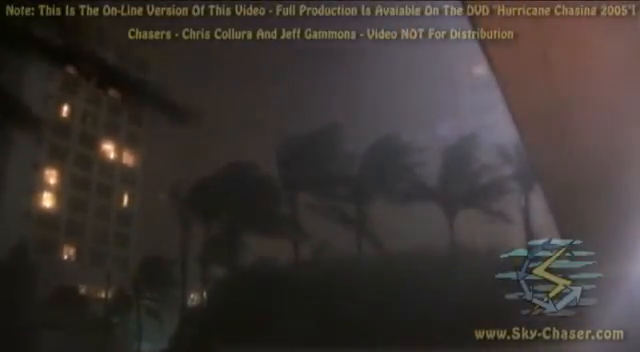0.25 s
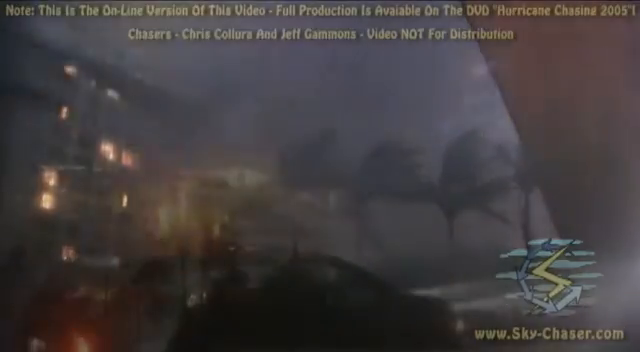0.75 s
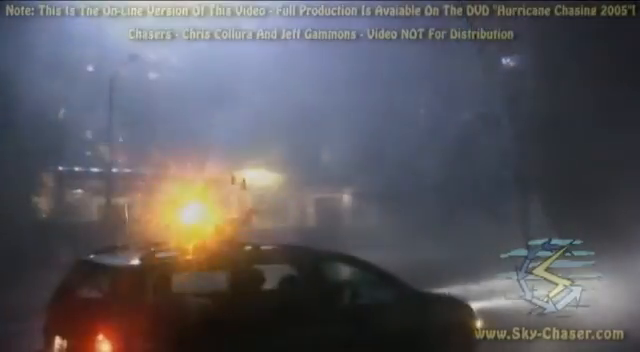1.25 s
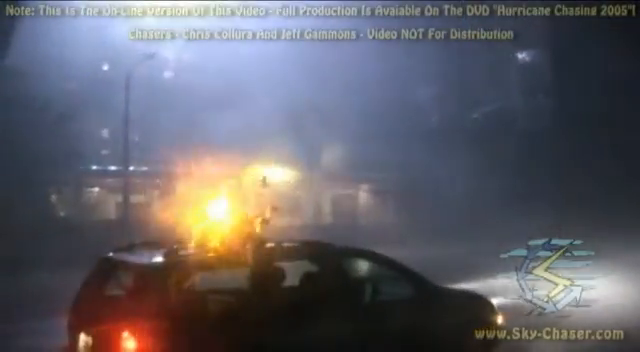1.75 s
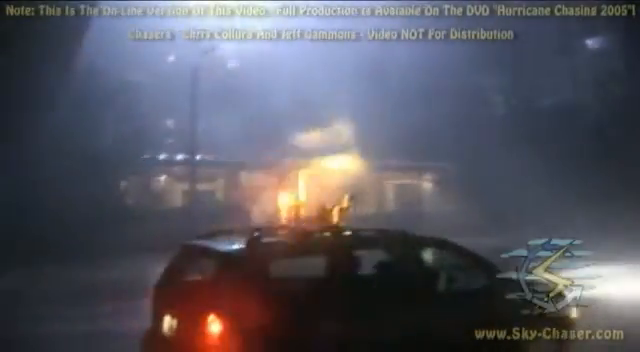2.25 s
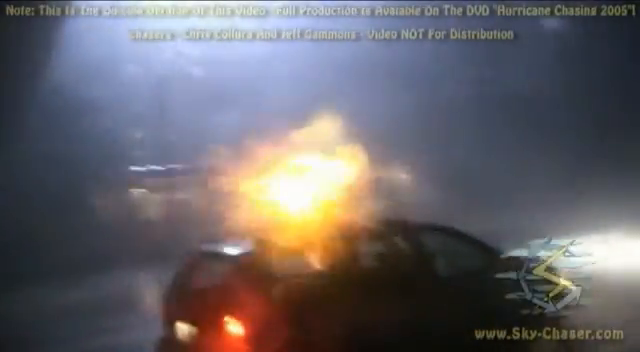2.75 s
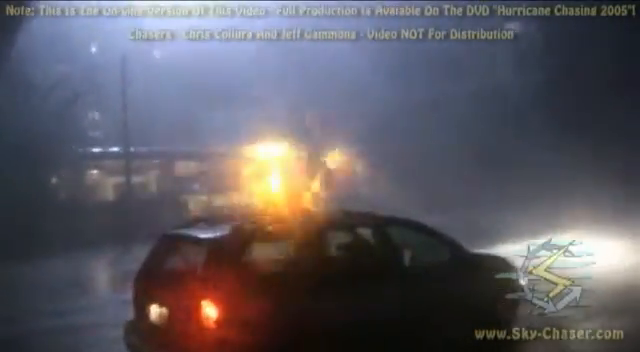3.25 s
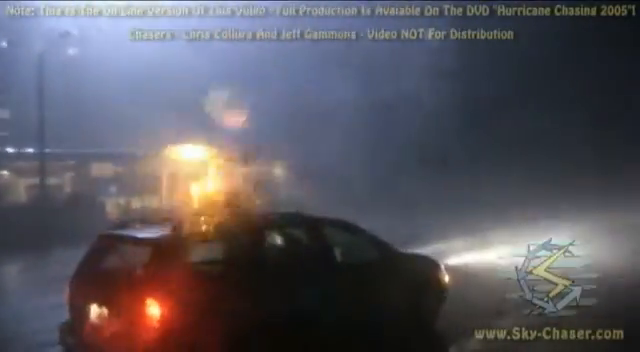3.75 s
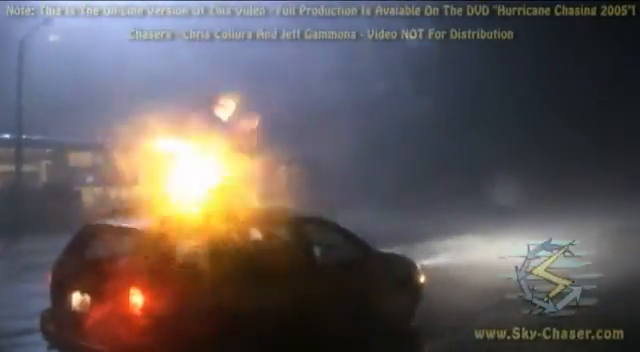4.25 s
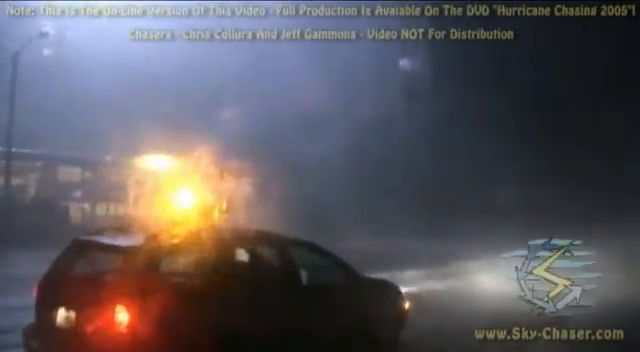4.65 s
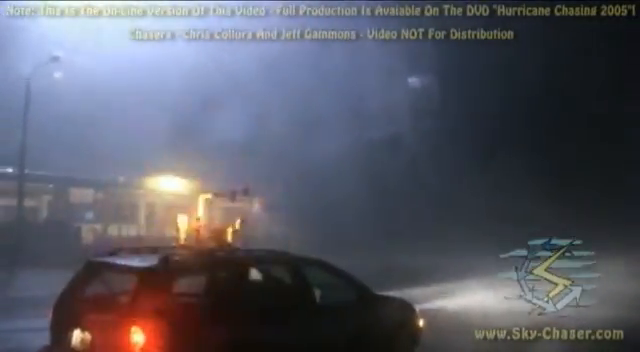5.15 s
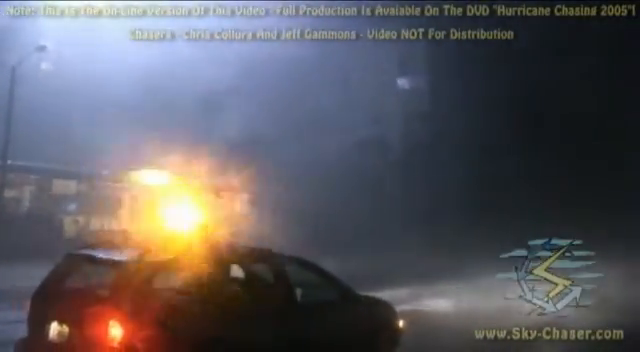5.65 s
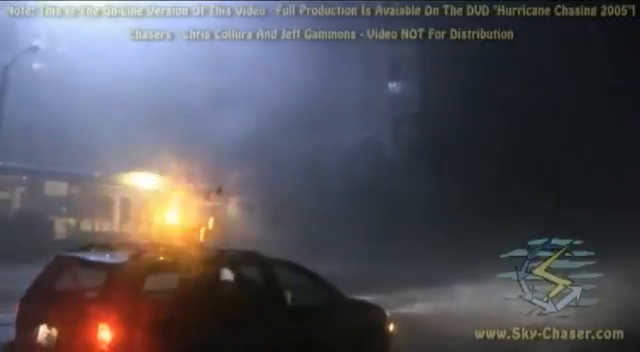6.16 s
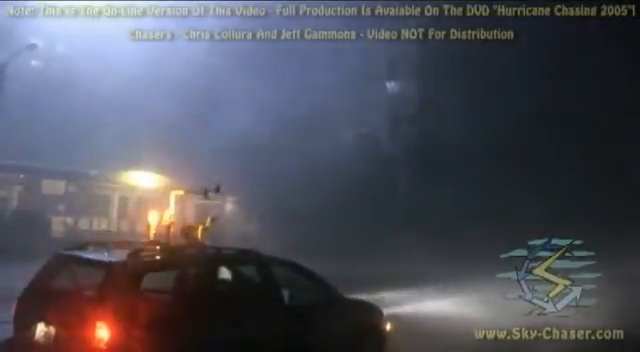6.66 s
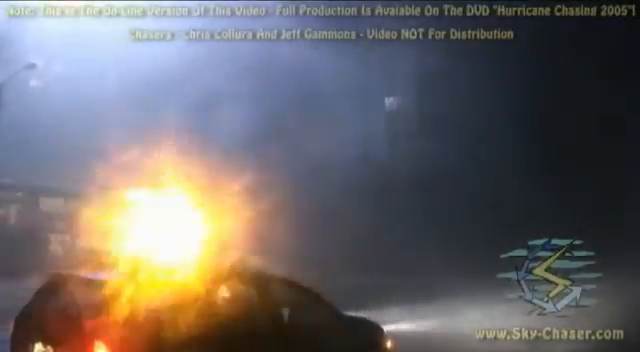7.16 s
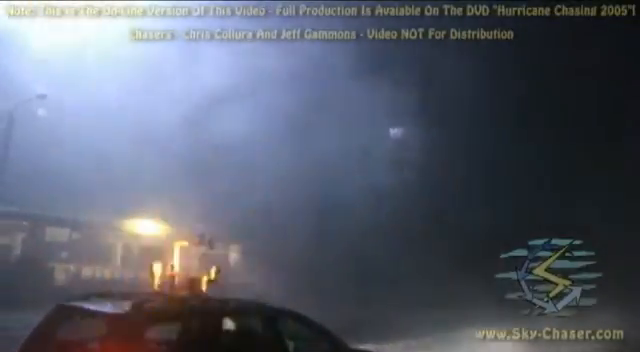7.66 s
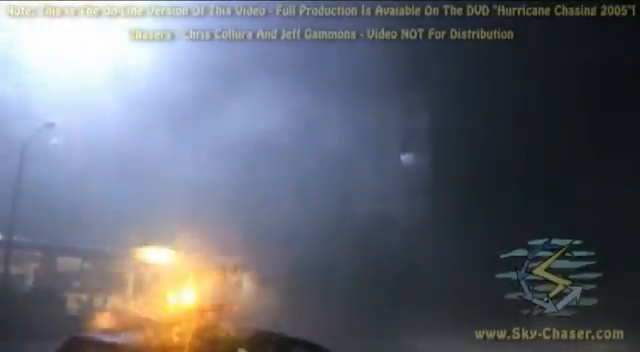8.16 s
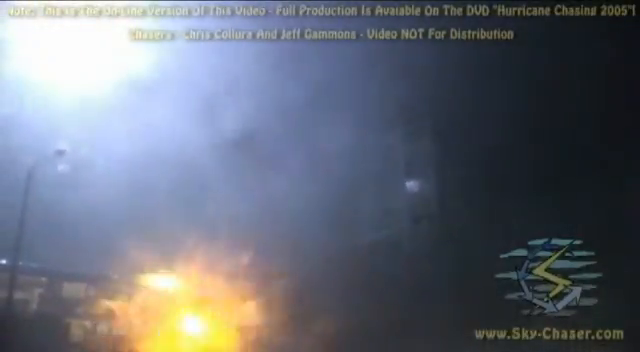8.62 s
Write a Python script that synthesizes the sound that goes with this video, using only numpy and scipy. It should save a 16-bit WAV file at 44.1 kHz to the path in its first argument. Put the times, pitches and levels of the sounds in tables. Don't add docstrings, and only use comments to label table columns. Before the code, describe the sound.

Continuous wide wind noise through palms and around walls, mixed with rain bursting on road and car. Small drops tick close by. Wind buffets the camera microphone with short dull thumps near the start, around one and a half seconds, and in a heavy cluster near seven. The wash slowly strengthens, then dips before a final swell. No engine is heard.

```python
import sys
import numpy as np
from scipy import signal
from scipy.io import wavfile
from scipy.ndimage import uniform_filter1d

SR = 44100
rng = np.random.default_rng(int(sys.argv[2]) if len(sys.argv) > 2 else 0)


def amplitude_ratio(level_db):
    exponent = np.asarray(level_db, float) / 20
    return 10 ** exponent


def to_wav(sig):
    pcm = np.clip(np.atleast_2d(sig), -1, 1) * 32767
    pcm = np.round(pcm).astype(np.int16)
    wavfile.write(sys.argv[1], SR, pcm.T)


N = 392049

# t/s, level/dB
WIND_LEVEL = [(0.0, -29.5), (0.07, -28), (0.17, -30.5), (0.47, -32.5), (0.74, -30.5), (1.21, -32.5),
              (1.26, -31), (3.44, -30), (3.94, -30.5), (4.31, -29), (5.1, -30), (5.27, -29), (6.16, -28.5),
              (6.56, -27), (7.3, -27), (7.8, -30), (8.57, -28.5), (8.89, -28.5)]
# t/s, level/dB
GUST_LEVEL = [(0.0, -45), (0.71, -48.5), (1.63, -39.5), (1.95, -46.5), (2.65, -40), (3.1, -49),
              (3.62, -50.5), (3.87, -45), (4.9, -42), (5.69, -35), (6.1, -38.5), (6.61, -31.5),
              (7.25, -32.5), (7.55, -37), (7.75, -43), (8.0, -43.5), (8.44, -36), (8.89, -36.5)]
# t/s, peak level/dB, left-right/dB
THUMPS = [(0.084, -25.5, 2), (0.29, -22, 1.0), (0.3, -22, -2.0), (0.32, -25, 3), (1.561, -23, -9),
          (1.633, -22, -3), (1.663, -24, -7.0), (1.769, -23, 12), (2.593, -22, -13), (2.723, -27, -1),
          (3.255, -29, -5), (3.512, -23, 17), (3.828, -25.5, -2.0), (5.777, -21, -1.0), (6.676, -26, -3),
          (6.733, -22, 2), (6.944, -16, 1), (6.968, -18, 0.0), (7.06, -23, 3), (7.172, -17, 2),
          (7.292, -18, 13), (7.307, -18, 3.0), (7.316, -19, 2), (7.334, -19, -2), (7.346, -17, 16),
          (7.604, -17.5, -3), (7.618, -17, -6), (7.634, -18, -6), (7.642, -17, -7), (8.732, -23, 0.0)]
# t/s, peak level/dB, f/Hz, left-right/dB
DROPS = [
    (0.7053, -13, 2030, 0.0),
    (0.9293, -14, 1570, 0.0),
    (1.4506, -13, 2930, 0.0),
    (3.5124, -18, 1700, 0.5),
    (3.7938, -19, 1740, 2),
    (5.139, -9.5, 1870, 0.0),
    (5.67, -19, 1980, 1.0),
]
# t/s, peak level/dB, half life-span/s
EDDIES = [(0.07, -47, 0.11), (0.29, -40, .05), (1.45, -45, 0.11), (1.7, -42, 0.15), (2.59, -36, .05),
          (2.73, -42, 0.053), (3.01, -51, .05), (3.26, -59, 0.025), (3.51, -38, 0.022), (3.87, -45, 0.1),
          (4.0, -43, 0.027), (4.2, -45, .05), (4.33, -45, .04), (4.72, -51, 0.027), (4.9, -51, .03),
          (5.07, -50, 0.036), (5.4, -42, .08), (5.67, -37.5, .05), (5.8, -35, 0.078), (6.18, -42, .06),
          (6.42, -40, 0.13), (6.62, -44, 0.046), (6.8, -39, .04), (6.97, -37, 0.062), (7.16, -37, 0.097),
          (7.32, -32, 0.088), (7.63, -35, 0.064), (7.75, -44, .03), (8.48, -46, 0.046), (8.6, -46, .04)]

# f/Hz, level/(dB per Hz)
ROAR_MID = [(560, -40), (950, -2), (1030, 0.5), (1320, -1.5), (1730, 0.5), (2400, -1.5), (2720, -4),
            (3310, -2), (4550, -12.5), (5110, -9), (5540, -14.5), (5970, -13), (6750, -29), (8780, -50),
            (14900, -120)]
ROAR_SIDE = [(560, -48), (950, -4), (2230, -2.5), (3270, -9.5), (4130, 0), (5220, -3), (5870, 1.5),
             (6280, -2), (7000, -12), (9100, -40), (15400, -120)]
# f/Hz, level/(dB per Hz)
BODY_MID = [(240, -11), (400, -2.5), (850, -1), (1100, -28), (1870, -120)]
BODY_SIDE = [(280, -33), (480, -7), (658, -5), (729, -2.5), (850, -3), (1100, -32), (1870, -120)]
# f/Hz, level/(dB per Hz)
SPRAY_MID = [(4400, -43), (7480, -8), (8580, -5.5), (9300, -7), (10200, -1.5), (11300, 0), (14500, -0.5),
             (15100, 0), (15700, -6)]
SPRAY_SIDE = [(4560, -31), (7750, -2), (9170, 0), (10500, -8), (11600, -3), (13000, 0), (15100, -1.5),
              (15700, -4)]
# f/Hz, level/(dB per Hz)
RUMBLE_LOW = [(8.8, -41), (15, -9.5), (107, 2.5), (129, -2.5), (150, -9.5), (200, -41), (330, -120)]
RUMBLE_UPPER = [(88, -39), (150, -3.5), (205, -2.5), (237, -1), (380, -6), (490, -47), (840, -120)]
# f/Hz, level/(dB per Hz)
EDDY_COLOUR = [(8.8, -39), (15, -4), (69, 2), (119, -0.5), (311, -6), (409, -7), (661, -10), (733, -10),
               (900, -9), (1170, -39), (1980, -120)]

CALM_DB, LULL_DB = -30, -43
BODY_DB, BODY_WIND, BODY_GUST = -40, 0.76, 0.32
UPPER_DB, UPPER_WIND, UPPER_GUST = -42.5, 0.57, 0.71
SPRAY_DB, SPRAY_WIND = -42.5, 1.3
SHEET_S, SHEET_WIDTH_S, SHEET_DB = 4.1, 0.43, 1.3
EDDY_FALL_DB, STILL_DB = -12, -76
WISPS_PER_S, WISP_DB, WISP_S = 3.5, -57, 0.015
SLAP_S, SLAP_REACH_S = 2.28 / 1000, 0.02
TOP_HZ = 15790


def evened(x):
    return x / np.sqrt(np.mean(x ** 2) + 1e-20)


def read_db(spectrum, hz):
    f, level_db = np.transpose(spectrum)
    return np.interp(np.log(hz + 1), np.log(f + 1), level_db, -120, -120)


def curve(rows):
    t, level_db = np.transpose(rows)
    return np.interp(np.arange(N) / SR, t, level_db)


def add(mix, s, sound):
    part = mix[:, round(s * SR):][:, :sound.shape[1]]
    part += sound[:, :part.shape[1]]


def noise(mid, side, side_db, size, patchy_db, flicker_db, swell_db):
    hop = size // 4
    frames, hz = N // hop + 5, np.fft.rfftfreq(size, 1 / SR)
    a, b, c, d, patches = rng.standard_normal((frames, len(hz), 5)).T
    patches = uniform_filter1d(patches, size=max(size // 90, 1), axis=0)
    patches = evened(uniform_filter1d(patches, size=3000 // hop, axis=1))
    shared = rng.standard_normal(frames)
    flicker = evened(uniform_filter1d(shared, size=1024 // hop))
    swell = evened(uniform_filter1d(shared[::-1], size=5000 // hop))
    colour_db = np.array([read_db(mid, hz), read_db(side, hz) + side_db])[:, :, None]
    motion_db = patchy_db * patches + flicker_db * flicker + swell_db * swell
    z = np.array([a + 1j * b, c + 1j * d]) * amplitude_ratio(colour_db + motion_db)
    out = signal.istft(z, nperseg=size, noverlap=size - hop)[1][:, :N]
    return out / np.sqrt(np.mean(out[0] ** 2))


def wind_db():
    return curve(WIND_LEVEL) - CALM_DB


def gust_db():
    return curve(GUST_LEVEL) - LULL_DB


def surge_db():
    return 3 * np.log1p(np.exp(gust_db() / 3))


def roar():
    wash = noise(ROAR_MID, ROAR_SIDE, side_db=-6.6, size=512,
                 patchy_db=0.37, flicker_db=0.42, swell_db=0.18)
    body = noise(BODY_MID, BODY_SIDE, side_db=-8.5, size=1024,
                 patchy_db=0.72, flicker_db=0.5, swell_db=0.5)
    body_db = BODY_DB + BODY_WIND * wind_db() + BODY_GUST * surge_db()
    return amplitude_ratio(CALM_DB + wind_db()) * wash + amplitude_ratio(body_db) * body


def spray():
    wash = noise(SPRAY_MID, SPRAY_SIDE, side_db=-0.6, size=512,
                 patchy_db=0.0, flicker_db=0.1, swell_db=0.07)
    sheet_db = SHEET_DB * np.exp(-((np.arange(N) / SR - SHEET_S) / SHEET_WIDTH_S) ** 2)
    return amplitude_ratio(SPRAY_DB + SPRAY_WIND * wind_db() + sheet_db) * wash


def eddies():
    t = np.arange(0, N / SR + .01, .002)
    draws = rng.random((round(WISPS_PER_S * N / SR), 2)) * [N / SR, 1]
    wisps = [(s, WISP_DB + 8 * u, WISP_S) for s, u in draws]
    size = np.full(len(t), amplitude_ratio(STILL_DB))
    for s, db, half_s in EDDIES + wisps:
        size += amplitude_ratio(db + EDDY_FALL_DB * ((t - s) / half_s) ** 2)
    return np.interp(np.arange(N) / SR, t, size)


def buffeting():
    low = noise(RUMBLE_LOW, EDDY_COLOUR, side_db=-5.5, size=2048,
                patchy_db=-0.04, flicker_db=-0.3, swell_db=-0.3)
    upper = noise(RUMBLE_UPPER, RUMBLE_UPPER, side_db=-30, size=2048,
                  patchy_db=0.67, flicker_db=1.3, swell_db=-0.65)
    upper_db = UPPER_DB + UPPER_WIND * wind_db() + UPPER_GUST * surge_db()
    mid = amplitude_ratio(LULL_DB + gust_db() + 2.1) * low[0] + amplitude_ratio(upper_db) * upper[0]
    return np.array([mid, eddies() * evened(low[1])])


def ping(hz, cycles):
    t = np.arange(0, 4 * cycles / hz, 1 / SR)
    return np.sin(2 * np.pi * hz * t) * np.exp(-t * hz / cycles) * (1 - np.exp(-.9 * t * hz))


def patter():
    out = np.zeros((2, N))
    for hz in np.geomspace(700, 5000, num=12):
        strength = amplitude_ratio(3.6 * np.minimum(rng.exponential(1, N), 4))
        hits = strength * (rng.random(N) < 40. / SR)
        lean = rng.uniform(-0.33, 0.49)
        ticks = signal.oaconvolve(hits, ping(hz, cycles=4.4))[:N]
        out += ticks * np.array([[1 + lean], [1 - lean]])
    out = evened(out) * amplitude_ratio(curve(WIND_LEVEL) - 17.5)
    for s, db, hz, pan_db in DROPS:
        sides_db = np.array([[pan_db], [-pan_db]]) / 2
        add(out, s, amplitude_ratio(db - 1 + sides_db) * ping(hz, cycles=2.5))
    return out


def thumps():
    out = np.zeros((2, N))
    u = np.arange(-SLAP_REACH_S, SLAP_REACH_S, 1 / SR) / SLAP_S
    push = -np.tanh(3.8 * u) * np.exp(-(u / 1.63) ** 2)
    rebound = 0.31 * np.exp(-((u - 2.8) / 0.68) ** 2)
    for s, db, pan_db in THUMPS:
        weaker_db = np.minimum([[pan_db], [-pan_db]], 0)
        add(out, s - SLAP_REACH_S, amplitude_ratio(db + weaker_db) * (push + rebound))
    return out


def scene():
    mid, side = roar() + spray() + buffeting()
    return np.array([mid + side, mid - side]) + patter() + thumps()


def low_pass(x):
    return signal.sosfilt(signal.butter(12, 15760, fs=SR, output="sos"), x)


def record(dry):
    lowpass = signal.firwin(1023, TOP_HZ, window=("kaiser", 9), fs=SR)
    mix = signal.oaconvolve(dry, lowpass[None], "same")
    return low_pass(mix)


dry = scene()
out = record(dry)
to_wav(out)
```